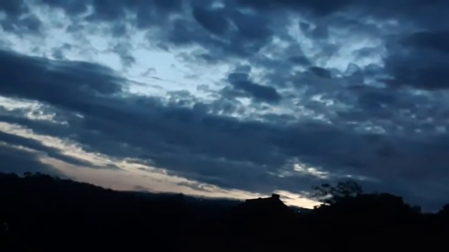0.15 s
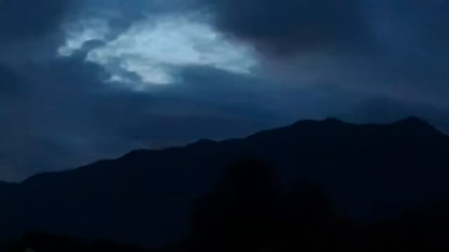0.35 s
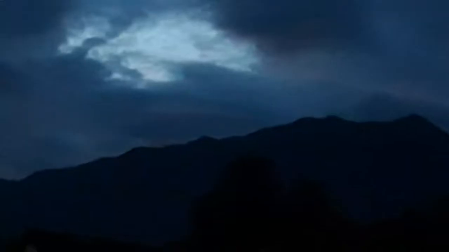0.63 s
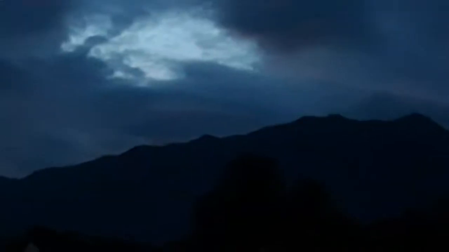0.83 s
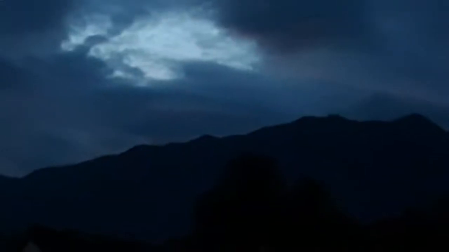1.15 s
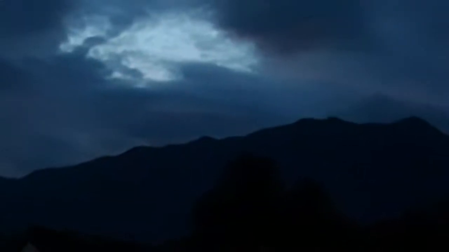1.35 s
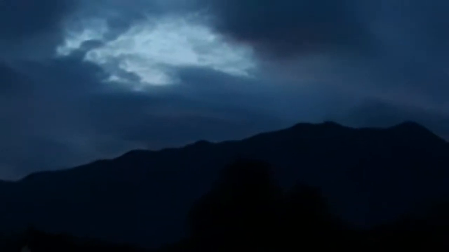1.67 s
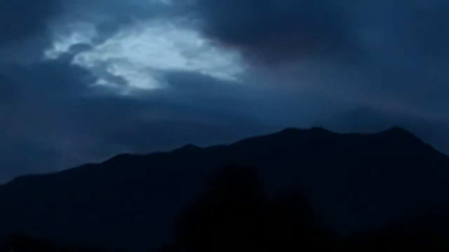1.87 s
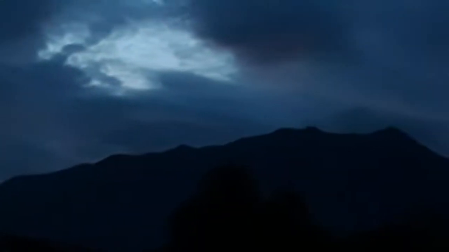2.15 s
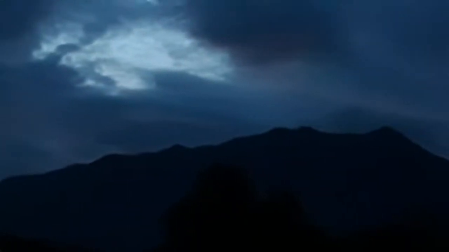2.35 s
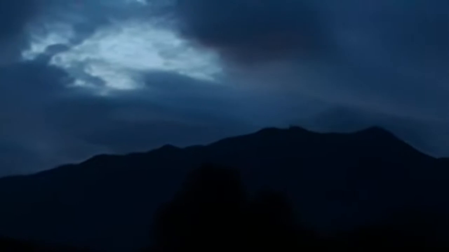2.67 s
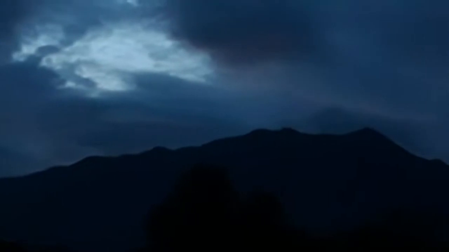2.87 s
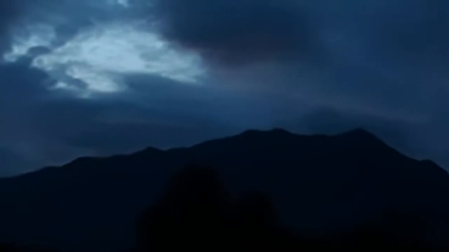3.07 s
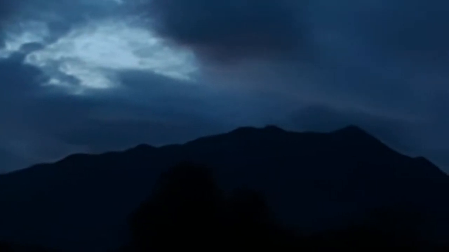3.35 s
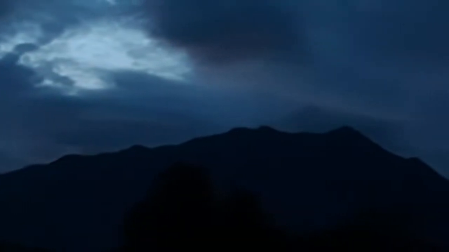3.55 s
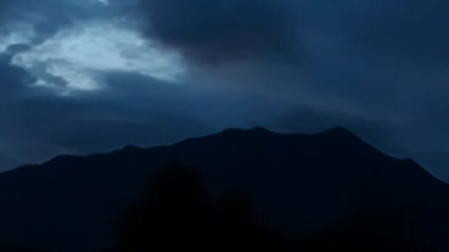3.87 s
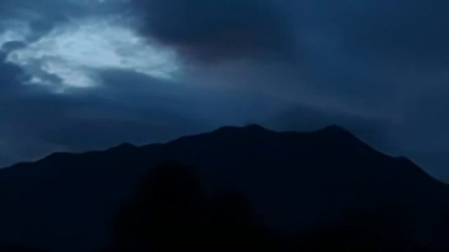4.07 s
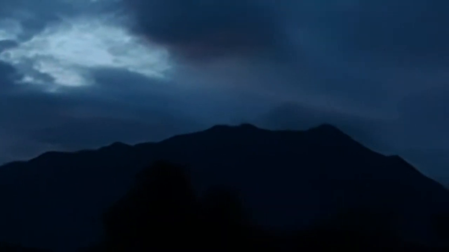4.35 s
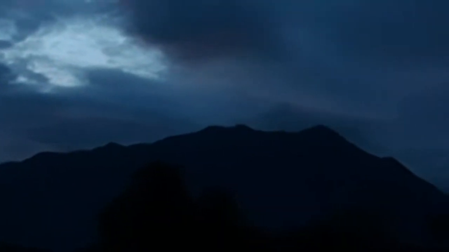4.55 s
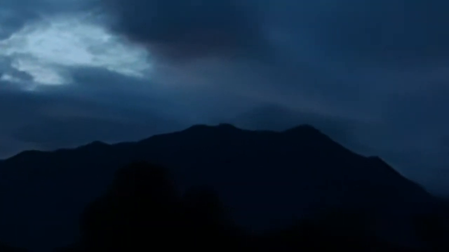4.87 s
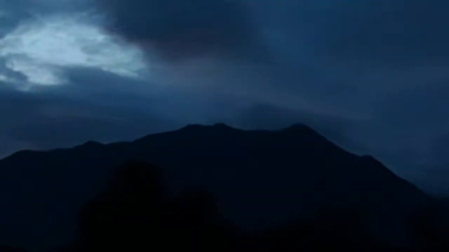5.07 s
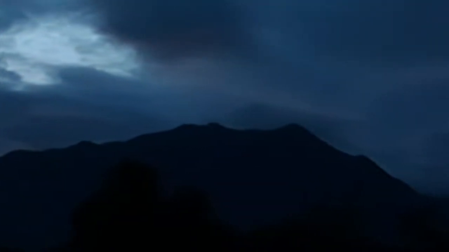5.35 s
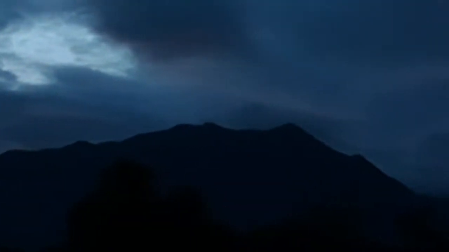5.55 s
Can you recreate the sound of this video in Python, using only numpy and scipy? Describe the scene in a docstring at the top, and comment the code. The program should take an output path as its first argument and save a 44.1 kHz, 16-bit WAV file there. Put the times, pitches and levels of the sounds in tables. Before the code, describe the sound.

Dark rice fields before dawn, heard almost in mono with soft air noise, faint hiss and short scattered echoes. Near tree frogs croak throughout, about five a second, each a rough pulsing rattle around 2.5 kHz, drooping slightly; a few deeper croaks sit underneath. Behind them far frogs and crickets trill densely without pause. At 0-0.3 s a clear, strong bird whistle slides down from about 4.9 to 4.5 kHz, a hard wooden knock with a quick echo lands at 0.1 s, and a brief low hum passes. A faint rooster note sounds at 0.3 s. A weaker, echoing whistle falls from 0.6 to 1.4 s. Katydids rasp in dry high buzzes roughly every second, with a longer one from 3.5 to 5 s. A near cricket gives four-stroke chirps about three a second, pausing around 2.7-3.7 s. Barely noticeable dull bumps occur. From 4.7 s another whistle drops steeply while distant roosters crow.

```python
"""Rice fields before dawn: near tree frogs croak in loose turns over far frogs, crickets and coloured air noise.
Throat pulses ring the frogs' sacs and wing strokes ring the crickets; katydids are bursts of band noise.
Birds whistle falling sines, far roosters crow on two partials, and a piece of wood is knocked and echoes.
There are also a brief low hum and a few dull bumps. One microphone feeds both channels, plus faint side hiss."""
import sys
import numpy as np
from scipy import signal
from scipy.fft import rfft, irfft
from scipy.io import wavfile
from scipy.ndimage import map_coordinates

SR = 44100
rng = np.random.default_rng(int(sys.argv[2]) if len(sys.argv) > 2 else 0)


def dump_mix(stems):
    """Bounce the given channels to the path in sys.argv[1] as a 16-bit WAV at rate SR."""
    frames = np.atleast_2d(stems).T  # one column per channel
    limited = np.clip(frames, -1, 1)  # hard clip at full scale
    pcm = np.round(limited * 32767).astype(np.int16)
    wavfile.write(sys.argv[1], SR, pcm)


N = 252252

# night air, far traffic and hiss, as relative spectrum points: f/Hz, level/dB per Hz
AIR_SPECTRUM = [(15, -75), (30, -37.5), (65, -20.5), (115, -15), (230, -25), (400, -32.5), (650, -32),
                (800, -22.5), (1630, -23.5), (2500, -16.5), (3150, -37.5), (4200, -26), (5010, -11),
                (6100, -26), (7900, -34), (8250, -45.5), (10000, -50), (15000, -50.5)]
AIR_DB = -39   # rms before the bed level
# movement of the air's low middle, used relative to its mean: t/s, level/dB
AIR_MURMUR = [(0, -59.5), (.9, -63.5), (2.6, -68.5), (3.7, -65.5), (4.2, -62.5), (5.72, -61)]
MURMUR_LOW_HZ, MURMUR_HIGH_HZ = 292, 700
# level of far frogs, crickets and air together, louder in the first 0.3 s: t/s, level/dB
BED_LEVEL = [(0, 9), (.1, 2.5), (.27, 4.5), (0.329, 1), (5.72, 1.5)]
# one low hum near the start: t/s, length/s, f/Hz, level/dB
LOW_HUM = (.03, .28, 215, -44)
# dull bumps on the microphone casing, before the window: t/s, level/dB
THUMPS = [(.36, -46), (.74, -51), (1.37, -52), (4.1, -51)]

FAR_FROGS_DB, CRICKETS_DB = -33, -41.5   # rms before the bed level and field echo
# wing pitches of the field crickets: f/Hz, relative level/dB
CRICKET_WINGS = [(4750, -5), (4890, 2.5), (5030, -2), (5250, -5), (5450, -3.5)]

# rooster notes: t/s, length/s, f/Hz, first partial level/dB, second partial level/dB, fade/dB per s
CROW_NOTES = [(.29, .18, 1305, -43, -60, -20), (4.7, 1.1, 727, -43, -36, -7),
              (4.89, .13, 566, -46, -65, -5), (4.99, .1, 640, -47, -65, -5), (5.25, .4, 566, -46, -65, -35)]
# the first partial starts 1.5 times this much up and settles at half; the second opens over the time
CROW_ONSET_DB, CROW_ONSET_S = 5, .15

# falling bird whistles, one list of glide points per call: t/s, f/Hz, level/dB
WHISTLES = [
    [(0, 4860, -23), (.075, 4705, -26), (.135, 4640, -21), (.165, 4595, -27), (.225, 4540, -20),
     (.255, 4505, -28), (.292, 4485, -29)],
    [(.56, 4950, -46), (.63, 4770, -38), (.74, 4620, -47), (.82, 4555, -33), (.92, 4530, -31),
     (.98, 4480, -48), (1.035, 4370, -34), (1.14, 4215, -49), (1.23, 4090, -46), (1.36, 3930, -54)],
    [(4.675, 6420, -44), (4.7, 5900, -53), (4.735, 5250, -39), (4.775, 4990, -37), (4.9, 4630, -37),
     (4.97, 4520, -47), (5.08, 4380, -46), (5.12, 4270, -34), (5.155, 4200, -50), (5.185, 4165, -37),
     (5.23, 4125, -52), (5.34, 4110, -37), (5.37, 4105, -58), (5.4, 4110, -38), (5.5, 4070, -50)],
]
# octave of each whistle, the nearest bird keeping most: level/dB re the fundamental
WHISTLE_OCTAVES = [-34, -44.5, -54]
# wavering of each whistle, more in the farther birds: spread/dB
WHISTLE_FLUTTER = [2.0, 4.5, 4.5]
FLUTTER_PER_S = 30
# echoes off the trees, nominal: delay/s, level/dB
TREE_ECHOES = [(.013, -4), (.027, -6), (.046, -10), (.07, -16)]
ECHO_DELAY_SCALE = .9

# katydid singers: strokes/per s, f/Hz, full width/Hz, level/dB
KATYDIDS = [(104.5, 7250, 1800, -48.5), (200, 7400, 2900, -48), (300, 14000, 900, -52)]
# katydid buzzes: t/s, length/s, row of the singer
BUZZES = [(.1, .64, 0), (1.06, .7, 0), (2.1, .78, 0), (3.2, .8, 0), (4.28, .79, 0), (3.5, 1.56, 1),
          (1.697, .03, 2), (1.742, .035, 2)]

# near cricket's chirps: t/s, relative level/dB
CHIRPS = [(0.364, -38), (0.646, -37.5), (.965, -38.5), (1.264, -38), (1.557, -37.5), (1.848, -39),
          (2.189, -38), (2.524, -38.5), (3.712, -38.5), (4.08, -39), (4.456, -38.5), (4.809, -40),
          (5.122, -39.5), (5.432, -39.5)]
# pitches each wing stroke falls through: delay/s, f/Hz, relative level/dB, gain/dB per stroke
STROKE_PITCHES = [(0, 5753, -1.5, 1.5), (0.014, 5675, -1.5, 0.5), (.026, 5430, -5, -1.5)]
STROKES_PER_S, CHIRP_STROKES = 31, 4
FIRST_STROKE_FLAT = .02   # fraction of the pitch

# blow on the wood and its echo: t/s, strike level/dB
KNOCKS = [(0.0794, -10), (0.085, -15), (.102, -19.5), (0.152, -18), (0.16, -20)]
# modes of the wood: f/Hz, relative level/dB, t60/s
WOOD_MODES = [(1118, 0, .06), (1235, -6, .07), (1290, -3, 0.07), (1400, -9, 0.045), (1670, -12, 0.05),
              (2290, -15, .04), (3000, -10, 0.029), (4180, -14, .02), (6120, -20, 0.02), (8350, -23, 0.017)]

# near tree frogs, two voices each, before the echo: t/s, length/s, level/dB of the first voice
CROAKS = [(0.035, 0.091, -26), (0.125, 0.19, -26.5), (0.385, 0.15, -31), (0.53, 0.3, -29.5),
          (0.86, 0.18, -27), (1.023, 0.19, -29.5), (1.21, 0.19, -30), (1.402, 0.18, -29),
          (1.55, 0.22, -27.5), (1.781, 0.18, -29.5), (1.956, 0.16, -29), (2.155, 0.14, -27),
          (2.35, 0.19, -27.5), (2.55, 0.2, -31), (2.749, 0.15, -25), (2.918, 0.15, -29), (3.093, 0.17, -29),
          (3.268, 0.16, -26), (3.452, 0.19, -26), (3.622, 0.14, -29.5), (3.786, 0.16, -25),
          (3.93, 0.19, -35), (4.111, 0.14, -31.5), (4.304, 0.16, -24), (4.51, 0.15, -28), (4.69, 0.21, -27),
          (4.849, 0.11, -31.5), (5.0, 0.19, -25), (5.14, .12, -36), (5.243, 0.17, -26.5),
          (5.428, 0.16, -31.5), (5.562, 0.24, -27)]
# larger frogs, same layout: t/s, length/s, level/dB of the first voice
DEEP_CROAKS = [(0.703, 0.087, -34), (1.337, 0.13, -38.5), (1.64, 0.14, -40), (2.05, 0.17, -39),
               (4.091, 0.19, -35.5), (5.414, 0.12, -40)]
# vocal sac resonances: ratio to the upper one, level/dB, t60/s
SAC_MODES = [(0.363, -15.5, 0.024), (0.447, -19, 0.024), (0.606, -22, 0.02), (0.801, -16, 0.03),
             (.96, -7, 0.011), (1.027, -4, 0.013), (1.122, -15, 0.016), (1.498, -28.5, .008)]
SAC_HZ, DEEP_SAC_HZ = 2504, 2030   # upper sac resonance at the start of a croak
SIZE_SPREAD = .012   # fractional spread of sac pitch between pairs of callers
FROG_PULSE_HZ, FROG_SPREAD = 88.4, .04   # throat pulse rate and its fractional spread
SAG_PER_S = .3   # fraction of pitch lost per second as the air runs out

LOW_EDGE_HZ = 915   # bass cut for frogs and wood
FIELD_T60_S, FIELD_DB = 0.23, -4.5
SIDE_HISS_DB, CUTOFF_HZ = -68.5, 15140


def from_db(db):
    """Decibels to gain."""
    return 10 ** (np.asarray(db) / 20)


def rms_one(x):
    """Scale to unit rms."""
    return x / np.sqrt(np.mean(x ** 2) + 1e-20)


def add(out, start_s, x):
    """Mix a sound in at a time, trimming what falls outside."""
    at = round(start_s * SR)
    x = x[max(-at, 0):N - at]
    out[max(at, 0):max(at, 0) + len(x)] += x


def ring(drive, hz, t60):
    """Two-pole resonator: a unit click sets off a dying sine of height 1."""
    radius, w = from_db(-60 / (t60 * SR)), 2 * np.pi * hz / SR
    return signal.lfilter([0, np.sin(w)], [1, -2 * radius * np.cos(w), radius ** 2], drive + 1e-18)


def drift(rate, size=N):
    """Random wander: straight lines between knots of spread 1, at a rate per second."""
    knots = rng.standard_normal(int(size * rate / SR) + 3)
    return np.interp(np.arange(size) * rate / SR, np.arange(len(knots)), knots)


def swell(length, rise, fall):
    """Straight fade in and out of one call, in seconds."""
    t = np.arange(round(length * SR)) / SR
    return np.clip(np.minimum(t / rise, (length - t) / fall), 0, 1)


def pulses(length, rate, jitter, uneven_db):
    """Click train with uneven spacing and strength, and room for the last ring."""
    luck = np.random.default_rng(rng.integers(1 << 30))
    count = int(length * rate) + 1
    at = (np.arange(count) + luck.random() + jitter * luck.standard_normal(count)) / rate
    strength = from_db(uneven_db * luck.standard_normal(count))
    keep = (at > 0) & (at < length)
    clicks = np.zeros(round(length * SR) + 2000)
    clicks[(at[keep] * SR).astype(int)] = strength[keep]
    return clicks


def no_bass(x):
    """Small bodies radiate nothing below their lowest resonance: a steep high-pass."""
    return signal.sosfilt(signal.butter(8, LOW_EDGE_HZ, "high", fs=SR, output="sos"), x)


def field(x):
    """Scattered echoes off banks and trees: a dying noise tail after a 4 ms gap."""
    t = np.arange(SR // 2) / SR
    tail = rng.standard_normal(len(t)) * from_db(-60 * t / FIELD_T60_S) * (t > .004)
    tail /= np.sqrt(np.sum(tail ** 2))
    return x + from_db(FIELD_DB) * signal.fftconvolve(x, tail)[:N]


def air():
    """Noise coloured by the air spectrum; its low middle sinks and returns."""
    hz = np.maximum(np.arange(N // 2 + 1) * SR / N, 1)
    point_hz, point_db = np.transpose(AIR_SPECTRUM)
    colour = from_db(np.interp(np.log(hz), np.log(point_hz), point_db))
    noise = from_db(AIR_DB) * rms_one(irfft(rfft(rng.standard_normal(N)) * colour, N))
    in_middle = (hz > MURMUR_LOW_HZ) & (hz < MURMUR_HIGH_HZ)
    middle = irfft(rfft(noise) * in_middle, N)
    swing_db = np.interp(np.arange(N) / SR, *np.transpose(AIR_MURMUR))
    return noise - middle + middle * from_db(swing_db - swing_db.mean())


def hum():
    """Noise in a low, broad resonance."""
    out, (s, length, hz, db) = np.zeros(N), LOW_HUM
    shape = swell(length, rise=0.058, fall=0.03)
    noise = rng.standard_normal(SR)[:len(shape)]
    tone = rms_one(ring(ring(noise, hz, t60=0.024), hz, t60=0.027))
    add(out, s, from_db(db) * shape * tone)
    return out


def far_frogs():
    """Far frogs of mixed sizes croak at random times, most of them small and high."""
    out = np.zeros(N)
    for when, size, length in rng.random((110, 3)):
        call = croak(.15 + .1 * length, 2000 + 650 * np.sqrt(size))
        add(out, when * N / SR - .1, call)
    return from_db(FAR_FROGS_DB) * rms_one(no_bass(out))


def crickets():
    """Three trilling crickets share each wing pitch; wings also sound a faint octave."""
    out = np.zeros(N)
    for hz, db in CRICKET_WINGS:
        clicks = np.zeros(N)
        for strokes_per_s in (47, 59, 78):
            trill = pulses(N / SR, strokes_per_s, jitter=.15, uneven_db=3.5)[:N]
            clicks += trill * from_db(1.2 * drift(4))
        wing = ring(ring(clicks, hz, t60=0.025), hz, t60=0.0067) / 100
        octave = from_db(-48) * ring(clicks, 2 * hz, t60=0.0087)
        out += from_db(db) * (wing + octave)
    return from_db(CRICKETS_DB) * rms_one(out)


def thumps():
    """Soft puffs of low noise under a rounded window."""
    out, low = np.zeros(N), signal.butter(2, 700, fs=SR, output="sos")
    for s, db in THUMPS:
        puff = rms_one(signal.sosfilt(low, rng.standard_normal(3000)))
        add(out, s, from_db(db) * puff * np.hanning(3000))
    return out


def roosters():
    """Far crowing keeps only two wavering partials; the upper one opens late."""
    out = np.zeros(N)
    for s, length, hz, first_db, second_db, fade_db in CROW_NOTES:
        shape = swell(length, rise=.035, fall=.06)
        t = np.arange(len(shape)) / SR
        wavering_hz = hz * (1 + .004 * drift(15)[:len(t)])
        phase = 2 * np.pi * np.cumsum(wavering_hz) / SR
        first = from_db(first_db + 4.0 * drift(25))[:len(t)]
        second = from_db(second_db + 3.5 * drift(25))[:len(t)]
        opened = np.minimum(t / CROW_ONSET_S, 1)
        onset = from_db(CROW_ONSET_DB * (1.5 - opened))
        tone = first * onset * np.sin(phase) + second * opened * np.sin(2 * phase)
        add(out, s, shape * from_db(fade_db * t) * tone)
    return out


def birds():
    """Near-sine falling whistles; tree echoes lag in pitch, so an echoed note beats with itself."""
    out = np.zeros(N)
    for rows, octave_db, flutter_db in zip(WHISTLES, WHISTLE_OCTAVES, WHISTLE_FLUTTER):
        s, hz, db = np.transpose(rows)
        t = np.arange(s[0], s[-1], 1 / SR)
        phase = 2 * np.pi * np.cumsum(np.interp(t, s, hz)) / SR
        flutter = flutter_db * drift(FLUTTER_PER_S)[:len(t)]
        gain = from_db(np.interp(t, s, db) + flutter)
        edge = np.clip(np.minimum(t - s[0] + 0.0019, s[-1] - t) / 0.0021, 0, 1)
        tone = np.sin(phase) + from_db(octave_db) * np.sin(2 * phase)
        note = np.sqrt(2) * gain * edge * tone   # root 2 makes the level an rms level
        add(out, s[0], note)
        if s[0] > 0:   # the first bird is too near for echoes
            for delay, echo_db in TREE_ECHOES:
                add(out, s[0] + delay * ECHO_DELAY_SCALE, from_db(echo_db) * note)
    return out


def katydids():
    """Each stroke is a short rasp of noise in a broad wing resonance, over a constant noise floor."""
    out = np.zeros(N)
    for s, length, singer in BUZZES:
        rate, hz, width_hz, db = KATYDIDS[singer]
        clicks = pulses(length, rate, jitter=0.02, uneven_db=1.2)
        strokes = np.convolve(clicks, np.hanning(round(.6 * SR / rate)), "same")
        noise = rng.standard_normal(SR * 2)[:len(strokes)]
        edges_hz = [hz - width_hz / 2, hz + width_hz / 2]
        band = signal.cheby2(5, 40, edges_hz, "band", fs=SR, output="sos")
        rasp = signal.sosfilt(band, (strokes + .2) * noise)[:round(length * SR)]
        rasp = ring(rasp, hz, t60=2.5 / width_hz)   # strongest at the centre
        add(out, s, from_db(db) * rms_one(rasp) * swell(length, rise=0.051 * length, fall=0.021))
    return out


def near_cricket():
    """Each wing stroke of a chirp is a short ring per pitch; the first stroke is a little flat."""
    out, strokes = np.zeros(N), np.arange(CHIRP_STROKES)
    for delay, hz, pitch_db, gain_db in STROKE_PITCHES:
        clicks = np.zeros((2, N))   # first strokes, later strokes
        for s, db in CHIRPS:
            at = s + delay + strokes / STROKES_PER_S + .0015 * rng.standard_normal(CHIRP_STROKES)
            stroke_db = db + pitch_db + gain_db * strokes + 1.1 * rng.standard_normal(CHIRP_STROKES)
            clicks[np.minimum(strokes, 1), (at * SR).astype(int)] = from_db(stroke_db)
        for train, wing_hz in zip(clicks, (hz * (1 - FIRST_STROKE_FLAT), hz)):
            out += from_db(-22.0) * ring(ring(train, wing_hz, t60=0.042), wing_hz, t60=0.02)
    return out


def knock():
    """The blow and its echo ring the wood's modes in varying strengths; the blow adds a short crack."""
    out = np.zeros(N)
    times, strike_db = np.transpose(KNOCKS)
    at = [round(s * SR) for s in times]
    for hz, mode_db, t60 in WOOD_MODES:
        clicks = np.zeros(SR)
        clicks[at] = from_db(strike_db + mode_db + 2.0 * rng.standard_normal(len(at)))
        add(out, 0, ring(clicks, hz, t60))
    crack = rng.standard_normal(1500) * from_db(-60 * np.arange(1500) / SR / 0.051)
    add(out, times[0], from_db(-28.0) * crack)
    dulled = signal.sosfilt(signal.butter(10, 9600, fs=SR, output="sos"), out)
    return no_bass(dulled)


def croak(length, hz):
    """Throat pulses ring each resonance of the vocal sac, a little differently in every croak."""
    luck = rng.standard_normal((1 + len(SAC_MODES), 2))
    pulse_hz = FROG_PULSE_HZ * (1 + FROG_SPREAD * luck[0, 0])
    clicks = pulses(length, pulse_hz, jitter=.015, uneven_db=1.5)
    clicks[:round(length * SR)] *= swell(length, rise=0.03, fall=0.051)
    out = np.zeros(len(clicks))
    for (ratio, db, t60), (detune, strength) in zip(SAC_MODES, luck[1:]):
        mode_hz = ratio * hz * (1 + 0.025 * detune)
        mode = rms_one(ring(ring(clicks, mode_hz, t60), mode_hz, t60))
        out += from_db(db + 1.43 * strength) * mode
    # play back ever more slowly, so pitch and pulse rate droop together
    t = np.arange(len(out)) / SR
    return map_coordinates(out, [(t - SAG_PER_S * t ** 2 / 2) * SR], order=3, prefilter=False)


def frogs():
    """Two frogs croak together each time, so their pulse trains beat roughly."""
    out = np.zeros(N)
    for rows, sac_hz in ((CROAKS, SAC_HZ), (DEEP_CROAKS, DEEP_SAC_HZ)):
        for s, length, db in rows:
            hz = sac_hz * (1 + SIZE_SPREAD * rng.standard_normal())
            pair = croak(length, hz) + from_db(-1.5) * croak(length, hz)
            add(out, s, from_db(db) * pair)
    return no_bass(out)


def scene():
    """Frogs, insects and knock echo across the field; all other layers skip the field echo."""
    bed = from_db(np.interp(np.arange(N) / SR, *np.transpose(BED_LEVEL)))
    chorus = bed * (far_frogs() + crickets())
    calls = katydids() + near_cricket() + knock() + frogs()
    straight = bed * air() + hum() + thumps() + roosters() + birds()
    return np.tile(straight + field(chorus + calls), (2, 1))


def record(dry):
    """A faint treble hiss of opposite sign in the two channels; the top is cut."""
    treble = signal.butter(6, 8300, "high", fs=SR, output="sos")
    hiss = signal.sosfilt(treble, rng.standard_normal(N))
    both = dry + from_db(SIDE_HISS_DB) * hiss * [[1], [-1]]
    return signal.sosfilt(signal.ellip(14, .5, 60, CUTOFF_HZ, fs=SR, output="sos"), both)


dry = scene()
out = record(dry)
dump_mix(out)
```